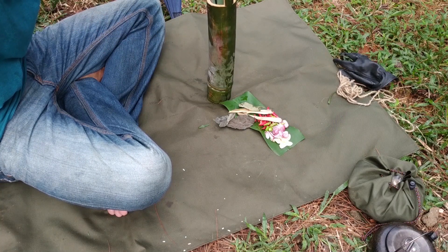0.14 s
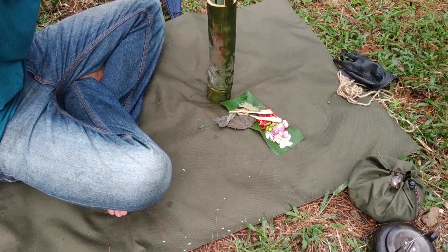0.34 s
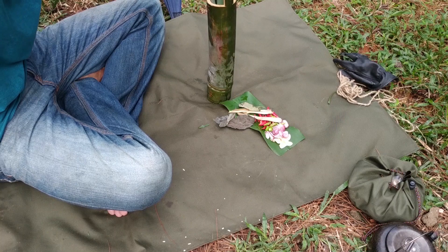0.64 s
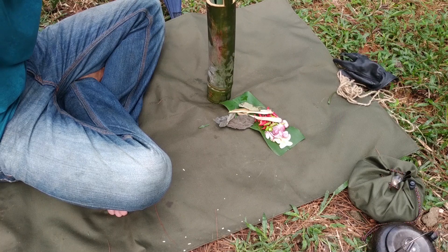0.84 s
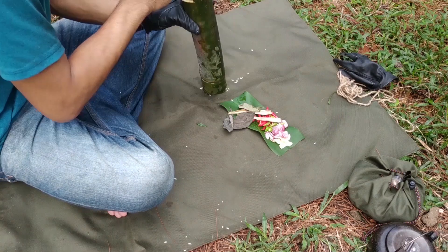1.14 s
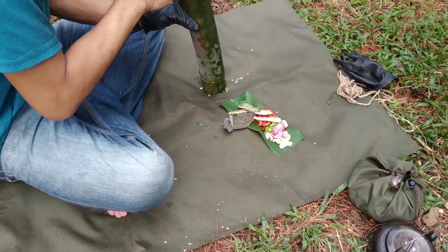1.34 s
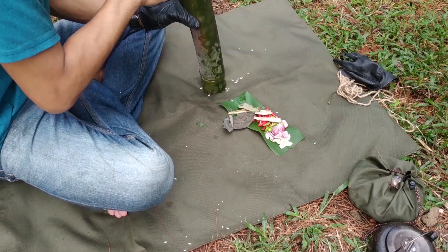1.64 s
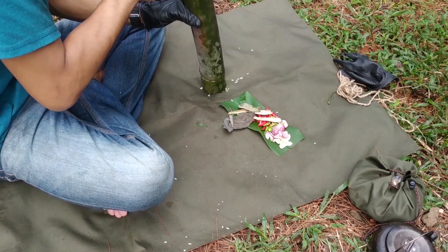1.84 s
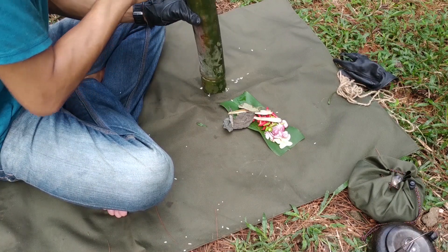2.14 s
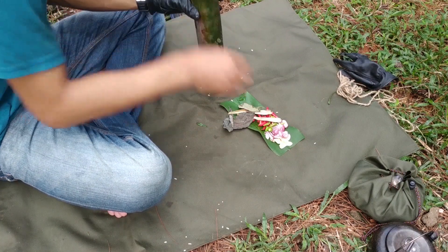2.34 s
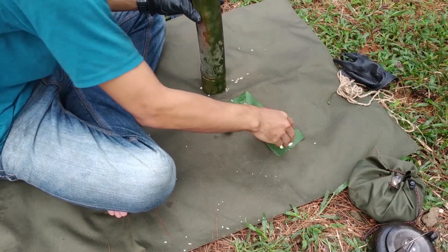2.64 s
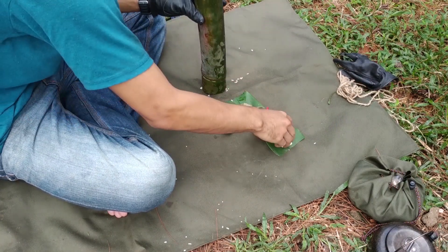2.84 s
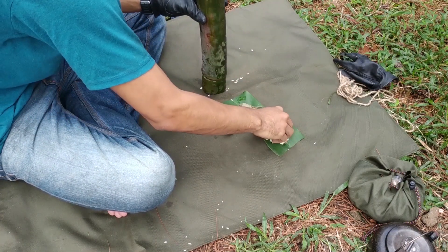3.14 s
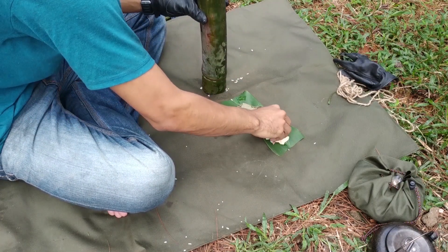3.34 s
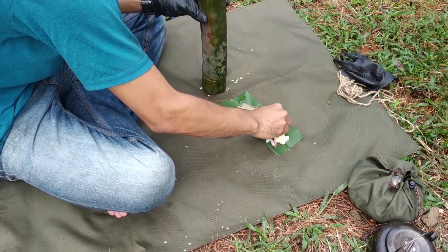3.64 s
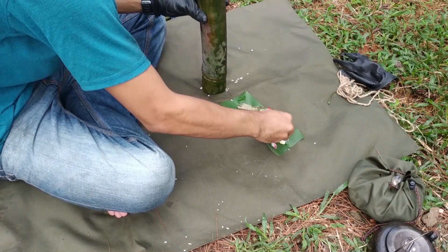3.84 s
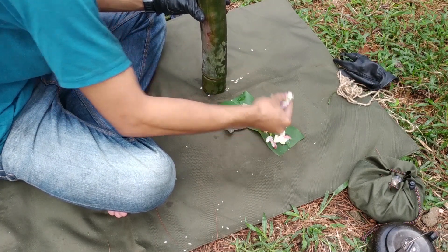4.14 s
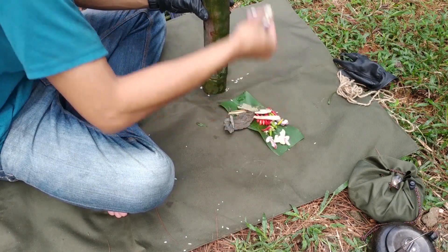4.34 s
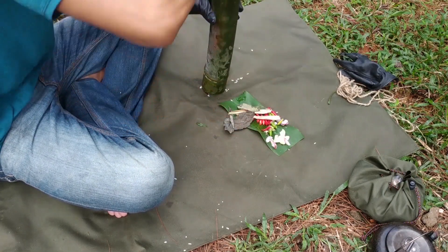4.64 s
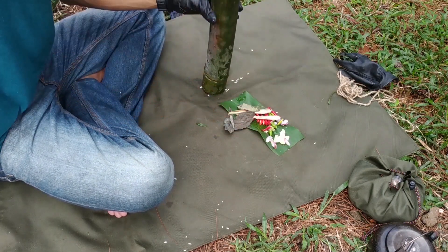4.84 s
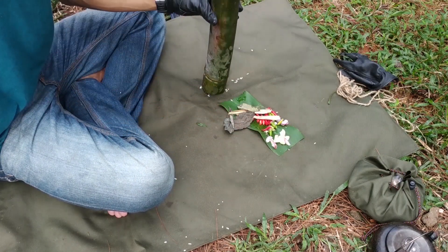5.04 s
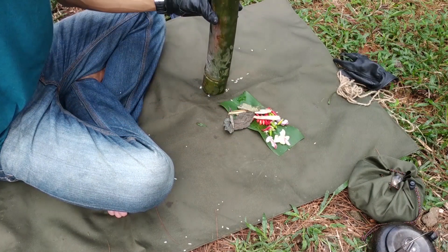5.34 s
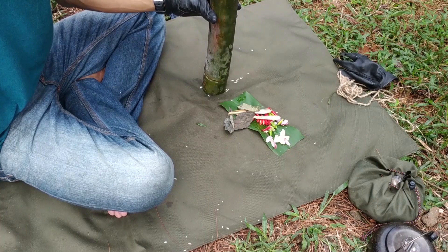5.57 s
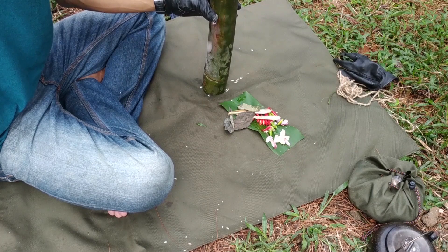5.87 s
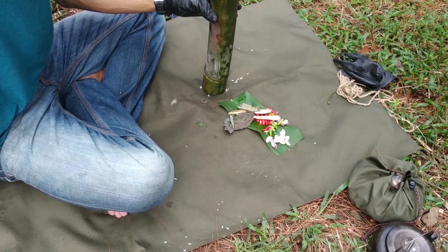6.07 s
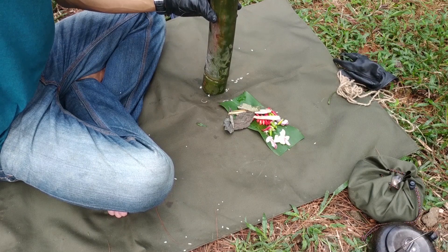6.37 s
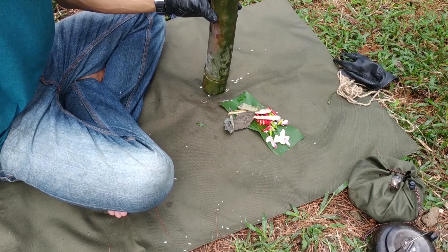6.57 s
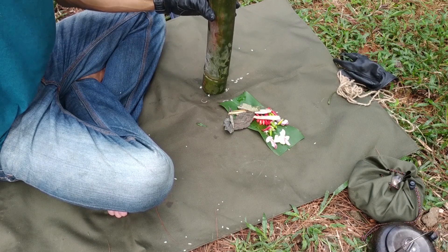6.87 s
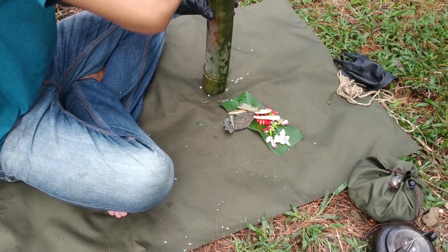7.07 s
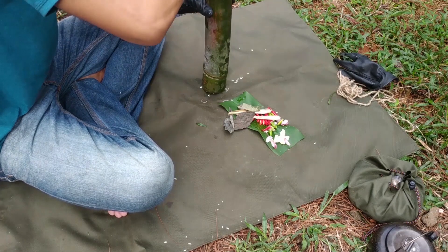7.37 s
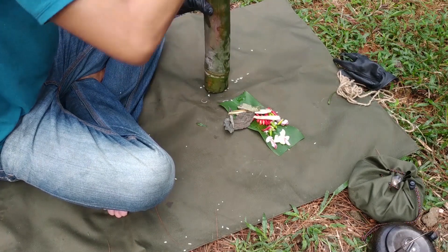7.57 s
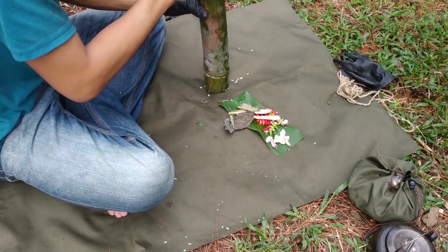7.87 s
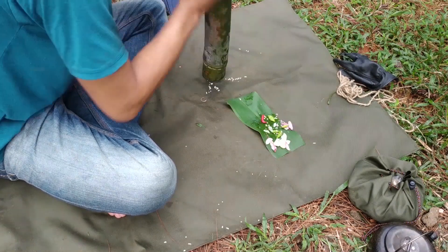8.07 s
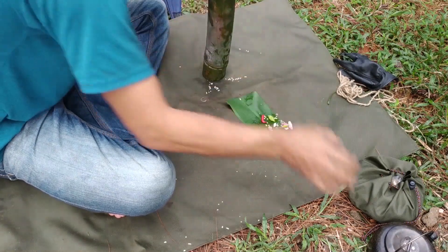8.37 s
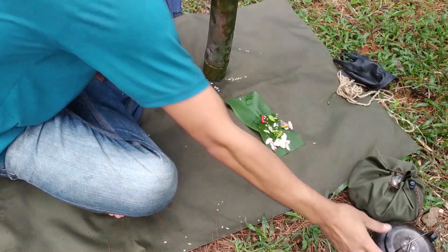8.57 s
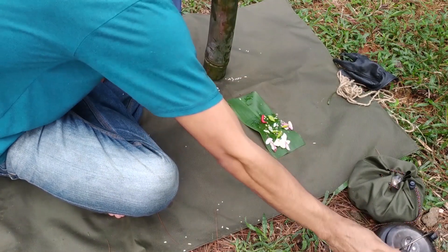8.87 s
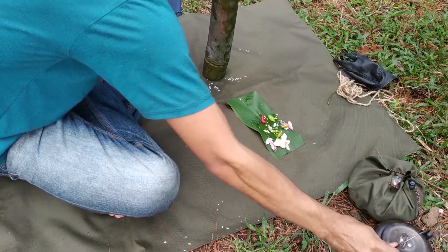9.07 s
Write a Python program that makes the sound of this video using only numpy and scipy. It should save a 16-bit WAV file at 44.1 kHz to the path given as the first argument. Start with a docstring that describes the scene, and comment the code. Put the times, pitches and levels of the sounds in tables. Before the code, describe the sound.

Near microphones at a wood's edge, grains rush briefly through plastic into a hollow tube, with sharp crinkly ticks. Several quick bag shakes and dull cloth bumps follow, then a calm stretch of insect buzz, high wavering whine, airy hiss and faint far calls. Small pieces knock drily in the tube while fingers rub and crackle softly. A distant drone swells slightly after six seconds; finally a metal lid clanks on a pot, short and dry.

```python
"""Rice into bamboo at the wood's edge

Close to the stereo microphones, dry rice runs from a plastic bag into a bamboo tube: showers of tiny grains.
The bag is shaken empty and its film snaps, as filtered noise; spices follow, with soft crackle and dead knocks.
A hand knocks a lidded pot, built from decaying modes and a noise clash, and dull bumps come off the cloth.
Behind are a thin gliding whine, a pulsed cicada buzz, faint far calls in narrow bands, hiss and low rumble."""
import sys
import numpy as np
from scipy import signal
from scipy.fft import rfft, irfft, next_fast_len
from scipy.io import wavfile

SR = 44100
rng = np.random.default_rng(int(sys.argv[2]) if len(sys.argv) > 2 else 0)


def dump_mix(stems):
    """Bounce the given channels to the path in sys.argv[1] as a 16-bit WAV at rate SR."""
    frames = np.atleast_2d(stems).T  # one column per channel
    limited = np.clip(frames, -1, 1)  # hard clip at full scale
    pcm = np.round(limited * 32767).astype(np.int16)
    wavfile.write(sys.argv[1], SR, pcm)


N = 406161

# Every table named ..._COLOUR is a spectrum. Each row: frequency in Hz, relative power density in dB.
# Low rumble in the distance.
RUMBLE_COLOUR = [(25, -26), (60, -33.5), (90, -18.5), (125, -13.5), (170, -2.5), (215, 0.5), (280, -6.5),
                 (400, -29.5), (800, -28.5)]
RUMBLE_DB, RUMBLE_WAVER_DB = -54.5, -1
# A deeper drone, perhaps far traffic, that swells and fades once; it is half as strong one width from its peak.
SWELL_COLOUR = [(50, -38), (90, -10.5), (130, 3.5), (190, 13.5), (270, 1), (400, -7), (800, -42.5)]
SWELL_AT_S, SWELL_WIDTH_S, SWELL_DB = 6.39, 0.78, -49
# Even hiss of the wood.
AIR_COLOUR = [(150, -9), (350, 1.5), (700, -2.5), (1500, -6.5), (2600, -3.5), (3500, 1.5), (4200, -9.5),
              (5100, -2), (7000, -2.5), (9700, -5.5), (12000, -7.5), (13400, 10.5), (15000, -48)]
AIR_DB = -47.5
# Stereo likeness of noise. Each row: frequency in Hz, correlation of left and right from -1 to 1.
LIKENESS = [(60, 1), (250, 0.76), (600, 0.54), (1400, 0.5), (3000, -0.13), (7000, -0.074), (15000, 0.25)]
# Calls far off in the trees. Each row: start in seconds, end in seconds, settled pitch in Hz,
# opening height above it in Hz, bandwidth in Hz, trill rate in Hz, level before the trill in dB.
CALLS = [(2.8, 3.845, 5060, 2, 400, 28.5, -58.5), (3.245, 3.613, 2570, -4, 260, 5.5, -59.5),
         (5.24, 5.605, 2350, 905, 150, 2, -54.5), (8.165, 8.696, 2820, -1, 300, 4, -59),
         (8.999, 9.3, 2360, 597.5, 260, 2, -51)]
# Band of the cicada.
CICADA_COLOUR = [(6500, -52), (7300, -6.5), (7750, 2), (8400, 6), (8800, 1.5), (9300, -43), (10500, -90)]
CICADA_DB = -44.5
# Tones of the whine. Each row: multiple of the fundamental, multiple of the flutter rate, relative level in dB.
WHINE_TONES = [(4, 0, 6), (4, -1, -3.5), (4, 1, -10.5), (4, -2, -34), (4, 2, -27), (4, -3, -33),
               (3, 0, -17.5), (2, 0, -10), (1, 1, -19.5)]
# Fundamental of the whine, left ear then right.
# Each row: base level in dB at the lowest pitch, base level in dB at the highest.
ROOT_EARS = [(-47.5, -55), (-53, -44.5)]
ROOT_FROM_S, ROOT_EARLY_DB = 1.65, -8   # the fundamental is weaker until then
FLUTTER_HZ, WHINE_EAR_LAG_S = 322, .00009
# pitches of the partial two octaves above the fundamental
WHINE_LOW_HZ, WHINE_SWING_HZ, WHINE_CREEP_HZ_PER_S = 13470, 148, 3
WHINE_CYCLE_S, WHINE_RISE_S, WHINE_LOWEST_AT_S = 1.995, .8, 1.28
# Soft bumps on the ground cloth. Each row: start in seconds, peak level before filtering in dB.
BUMPS = [(1.28, -61), (1.48, -55), (8.16, -56)]
# Dull colour of the bumps.
BUMP_COLOUR = [(25, -8), (70, -7), (140, 5), (400, -33), (1000, -74)]
BUMP_S = 0.1   # time to die away by 60 dB
# Knocks on the pot. Each row: start in seconds, relative body level in dB, metallic clash level in dB,
# clash decay by 60 dB in seconds, pitch factor of the low modes.
KNOCKS = [(8.72, -27.5, -27, 0.14, 0.97), (8.7438, -30, -14, 0.072, 1.04), (8.7475, -24.5, -15, 0.071, 1.0),
          (8.78, -29.5, -35.5, 0.27, 1.06), (8.815, -39.5, -40.5, 0.11, .9), (8.893, -33, -34, 0.33, .93),
          (8.974, -33.5, -18, 0.017, 0.78)]
# Modes of the pot and its lid. Each row: frequency in Hz, relative level in dB, decay by 60 dB in seconds.
POT = [(320, -17, 0.12), (454.6, -10.5, 0.28), (537, 4, 0.066), (581, -7, 0.11), (693, -9, 0.1),
       (880, -16, 0.15), (1142, -14, 0.14), (1210, -15, 0.09), (1770, -4, 0.046), (1906, -3, 0.064),
       (2450, -4.5, 0.15), (4140, -18, 0.1), (4710, 2, 0.058), (6000, -29, .07), (6900, -10, 0.12),
       (7400, -21, .04)]
# Metallic clash of lid on pot.
CLASH_COLOUR = [(530, -24), (900, -2), (1620, -10), (1990, 5.5), (2760, -38), (3150, 2.5), (4460, -1.5),
                (5480, 4), (6250, 2), (7680, 7), (16000, -6)]
# Thud of the ground beneath the pot.
THUD_COLOUR = [(25, -4), (70, -5), (300, -11), (1000, -16)]
# Stray grains and pieces landing in the tube. Each row: start in seconds, relative peak in dB, pitch in Hz.
TAPS = [(0.51, -33, 880), (0.675, -35, 1900), (0.767, -36, 1400), (0.829, -31.5, 1170), (1.799, -32, 2100),
        (1.943, -37, 2570), (2.211, -35, 1600), (2.221, -36, 710), (4.013, -42, 1030), (4.779, -47.5, 1020),
        (4.945, -38, 1490), (5.004, -42, 1810), (5.709, -33, 2270), (5.848, -41, 2200), (5.9583, -29, 1210),
        (5.968, -28.5, 1370), (5.9911, -28.5, 756), (6.165, -27.5, 1075), (6.167, -51, 1150),
        (6.227, -33.5, 3240), (6.347, -39.5, 2120), (6.445, -35.5, 2840), (6.485, -35.5, 765),
        (6.847, -36, 2340), (6.925, -45.5, 2500), (7.029, -45.5, 1200), (7.122, -38, 2120),
        (7.204, -41, 2120), (7.256, -41.5, 595), (7.346, -36, 2200), (7.465, -40, 2100),
        (7.944, -41.5, 1910), (8.053, -30, 3200), (8.135, -43, 716)]
# Grains stirred under a landing piece.
STIR_COLOUR = [(300, 8.0), (1100, 6), (2500, 6.5), (4500, 1), (14000, -7)]
# Fingers rub spices into the mouth of the tube.
# Each row: start in seconds, length in seconds, relative rustle level in dB.
RUBS = [(4.39, 0.061, -67.5), (4.79, 0.16, -68.5), (4.98, 0.074, -64), (5.48, 0.027, -65.5),
        (5.76, 0.012, -63.5), (6.06, 0.041, -65), (6.18, 0.054, -60.5), (6.48, 0.14, -65.5),
        (6.7, 0.079, -62), (7.275, 0.11, -58.5), (7.42, .05, -63), (7.56, 0.077, -64.5),
        (7.935, 0.024, -61), (8.03, 0.15, -63.5)]
# Crackle of fingers and spices.
FINGER_COLOUR = [(200, 2), (600, 10.5), (1500, 7), (2600, 10.5), (4000, 8), (6000, 11), (11000, 2.5),
                 (16000, -119)]
RUB_ATTACK_S, RUB_RELEASE_S = 0.038, 0.051   # time to rise and to fall by 20 dB
GRIP_S, GRIP_DB = (5.6, 7.6), -73   # the glove creaks faintly on the tube; level relative to the rubs
# Snaps of thin plastic, and two hard ticks of rice grains at 0.119 s and 0.463 s. # Each row: start in seconds,
# relative peak in dB, relative body against the tick in dB.
SNAPS = [(0.119, -16, -25), (0.1766, -2, -32), (0.2965, -7, -26), (0.4227, -3.5, -28), (0.4304, -14, -26),
         (0.463, -10, -22), (0.5184, -11, -13), (0.8885, -5.5, -48), (1.104, -24, -3), (5.0474, -16, -30),
         (6.7204, -18, -14), (7.357, -14.5, -0.5), (7.567, -22, -10), (8.0502, -14, -24)]
# Bright tick of a snap, then its body.
TICK_COLOUR = [(3000, -15.0), (7000, 4.0), (10000, 18.0), (16000, -1.5)]
SNAP_BODY_COLOUR = [(500, -46), (2000, 10.5), (9000, 1)]
# Shakes of the bag. Each row: start in seconds, length in seconds, relative rustle level in dB.
SHAKES = [(1.065, 0.043, -62), (1.145, 0.061, -51.5), (1.27, .045, -56.5), (1.385, 0.043, -52),
          (1.485, 0.049, -51), (1.595, 0.022, -50.5), (1.93, 0.012, -64), (2.13, 0.12, -58.5)]
# Rustle of the film.
BAG_COLOUR = [(120, -27), (200, -10), (311, -16), (709, -17), (1370, -4), (3020, 3), (3900, -6),
              (5230, 1.5), (12600, 3.5), (13300, 7), (16000, -16)]
SHAKE_ATTACK_S, SHAKE_RELEASE_S = 0.034, 0.036   # time to rise and to fall by 20 dB
BAG_HELD_S, BAG_HELD_DB = (0, 2.1), -71   # the film stirs faintly while held; level relative to the shakes
# Grains shaken down into the tube.
FALLING_COLOUR = [(300, -8.5), (520, 3.5), (750, 0), (1200, -4.5), (3000, -6.5), (8000, -59)]
# Spurts of last grains against the bag.
# Each row: start in seconds, relative peak in dB, decay by 60 dB in seconds.
SPURTS = [(1.1373, -12, 0.037), (1.162, -27, 0.022), (1.267, -18, 0.062), (1.48, -15, 0.018),
          (1.4827, -0.5, 0.011), (1.4942, 0.5, 0.016), (1.509, -21, 0.022), (1.514, -5.5, 0.016),
          (1.509, -11, 0.037), (1.525, -15, 0.039), (1.529, -13.5, 0.018), (1.535, -8, 0.018),
          (1.535, -12, 0.018), (1.613, -21, 0.059)]
# Bright colour of the spurts.
SPURT_COLOUR = [(220, -8), (450, -11.5), (1000, -0.5), (1900, 4), (3000, 2.5), (5500, -1.5), (9500, 7),
                (13000, 0), (16000, -2.5)]
# Stream of rice. Each row: time in seconds, relative patter in the tube in dB, relative hiss of sliding in dB.
POUR = [(0.0, -37.5, -39.5), (0.24, -31.5, -34), (0.428, -35.5, -34.5), (0.494, -43, -39),
        (0.512, -34, -40), (0.57, -45.5, -46.5), (0.692, -42.5, -43), (0.934, -53, -55), (1.04, -78, -65)]
# Patter of grains on the heap.
PATTER_COLOUR = [(88, -24), (150, -24), (210, -9), (258, -3.5), (299, -2.5), (562, -0.5), (835, 2),
                 (1010, 1.5), (1870, 2), (3670, 1), (5000, -6), (6500, -17), (11000, -120)]
# Hiss of grains sliding over plastic.
SLIDE_COLOUR = [(2000, 0), (3500, -5.5), (5500, 3.5), (6500, -0.5), (9000, 1.5), (12500, -1), (15500, -2),
                (17000, -71)]
CUTOFF_HZ = 16100


def from_db(db):
    """Amplitude of a level in dB."""
    return 10 ** (np.asarray(db) / 20)


def rms_one(x):
    """Scale to an RMS of one."""
    return x / np.sqrt(np.mean(x ** 2) + 1e-20)


def seconds():
    """Time of every sample."""
    return np.arange(N) / SR


def in_time(rows):
    """The columns of a curve, sample by sample."""
    s, *columns = np.transpose(rows)
    return [np.interp(seconds(), s, c) for c in columns]


def during(start, end, fade=0.015):
    """One between two times, with soft edges outside them."""
    inside = np.minimum(seconds() - start, end - seconds())
    return np.clip(inside / fade + 1, 0, 1)


def at_hz(points, size):
    """A spectrum table on the bins of a transform, interpolated over log frequency."""
    hz, values = np.transpose(points)
    bins_hz = np.arange(size // 2 + 1) * SR / size
    return np.interp(np.log(bins_hz + 1), np.log(hz), values)


def drift(rate):
    """Slow random wander of spread 1, smoothed by two poles at a rate in Hz."""
    step = 40   # samples between drawn points
    r = np.exp(-2 * step * np.pi * rate / SR)
    raw = rng.standard_normal(N // step + 2002)
    slow = signal.lfilter([1], [1, -2 * r, r * r], raw)[2000:]
    return np.interp(np.arange(N) / step, np.arange(len(slow)), rms_one(slow))


def coloured(x, spectrum):
    """Minimum-phase filter with the given spectrum and a steep low end; white noise keeps its power."""
    size = 4096
    hz = np.arange(size // 2 + 1) * SR / size
    low_end = np.clip(hz / spectrum[0][0], .03, 1) ** 2
    gain = rms_one(from_db(at_hz(spectrum, size)) * low_end)
    # folding the cepstrum forward makes the response causal
    cepstrum = irfft(np.log(gain))[:size // 2]
    cepstrum[1:] *= 2
    response = irfft(np.exp(rfft(cepstrum, size)))
    return signal.fftconvolve(np.atleast_2d(x), response[None], axes=-1)[:, :N]


def spread(pair):
    """Two unrelated signals become left and right, alike in the bass and mostly apart in the treble."""
    size = next_fast_len(N + N % 2) // 2 * 2
    alike = np.clip(at_hz(LIKENESS, size), -.99, .99)
    mid, side = irfft(rfft(pair, size) * np.sqrt([1 + alike, 1 - alike]), size)[:, :N]
    return np.array([mid + side, mid - side]) / np.sqrt(2)


def noise():
    """White noise across the stereo width."""
    return spread(rng.standard_normal((2, N)))


def grains(per_s, size_db):
    """Tiny collisions at random moments, their strength in dB spread by a capped exponential draw."""
    born = rng.random(N) < per_s / SR
    sizes = from_db(size_db * np.minimum(rng.exponential(1, N), 4))
    return rms_one(spread(born * sizes * rng.standard_normal((2, N))))


def bursts(times, levels_db, lengths):
    """Sudden rushes of noise that die by 60 dB in their length."""
    envelope = np.zeros(N)
    for s, db, t60 in zip(times, levels_db, lengths):
        start = round(s * SR)
        age = seconds()[:min(SR // 4, N - start)]
        envelope[start:][:len(age)] += from_db(db - 60 * age / max(t60, .001))
    return envelope * noise()


def strokes(rows, attack_s, release_s):
    """Gain of a series of hand movements: each rises, holds for its length and falls."""
    t, gain = seconds(), np.zeros(N)
    for start, length, db in rows:
        before = np.maximum(start - t, 0) / attack_s
        after = np.maximum(t - start - length, 0) / release_s
        gain = np.maximum(gain, from_db(db - 20 * np.minimum(before + after, 10)))
    return gain


def outdoors():
    """Low far rumble, with one slow swell, under the even hiss of the wood: three filtered noises."""
    rumble = from_db(RUMBLE_DB + RUMBLE_WAVER_DB * drift(4.5)) * coloured(noise(), RUMBLE_COLOUR)
    nearness = 1 / (1 + ((seconds() - SWELL_AT_S) / SWELL_WIDTH_S) ** 2)
    swell = from_db(SWELL_DB) * nearness * coloured(noise(), SWELL_COLOUR)
    air = from_db(AIR_DB) * coloured(noise(), AIR_COLOUR)
    return rumble + swell + air


def far_calls():
    """Each trilled call glides to its note; echoes among the trees are rendered as a narrow noise band."""
    out, source = np.zeros((2, N)), noise()
    glide_s = .022
    for start, end, hz, fall_hz, width_hz, trill_hz, db in CALLS:
        age = np.maximum(seconds() - start, 0)
        pitch_hz = hz + fall_hz * np.exp(-age / glide_s)
        note = np.cos(2 * np.pi * np.cumsum(pitch_hz) / SR)
        smear = signal.sosfilt(signal.butter(2, width_hz / 2, fs=SR, output="sos"), source)
        trill = np.cos(np.pi * trill_hz * age) ** 2
        out += from_db(db) * rms_one(note * smear) * trill * during(start, end, fade=0.009)
    return out


def cicada(pulse_hz=118, pulse_depth=0.25):
    """Tymbal pulses, slightly unsteady in rate, shape noise in a broad resonance at a steady level."""
    phase = 2 * np.pi * np.cumsum(pulse_hz + 4 * drift(6.7)) / SR
    pulses = rms_one(np.exp(pulse_depth * np.cos(phase)))
    return from_db(CICADA_DB) * coloured(pulses * noise(), CICADA_COLOUR)


def whine(top_db=-44.5, echo_db=-8, dip_db=6, dip_height=0.4, dip_width=0.22):
    """A shrill glide, perhaps an insect, with flutter tones, a mid-glide dip and two echoes at each ear."""
    t = seconds()
    cycle_s = (t - WHINE_LOWEST_AT_S) % WHINE_CYCLE_S
    height = np.interp(cycle_s, [0, WHINE_RISE_S, WHINE_CYCLE_S], [0, 1, 0])
    top_hz = WHINE_LOW_HZ + WHINE_SWING_HZ * height + WHINE_CREEP_HZ_PER_S * t
    # phase of the fundamental, two octaves below
    phase = 2 * np.pi * np.cumsum(top_hz + 2 * drift(20)) / SR / 4
    flutter = 2 * np.pi * FLUTTER_HZ * t
    shrill = np.zeros(N)
    for multiple, offset, db in WHINE_TONES:
        shrill += from_db(top_db + db) * np.cos(multiple * phase + offset * flutter + drift(.5))
    shrill *= from_db(-dip_db * np.exp(-((height - dip_height) / dip_width) ** 2))
    early_db = ROOT_EARLY_DB * during(0, ROOT_FROM_S, fade=0.079)
    out = np.zeros((2, N))
    # the fundamental leans left when low and right when high
    for ear, (low_db, high_db) in enumerate(ROOT_EARS):
        lags_s = rng.uniform([.015, .035], [.03, .055])
        echoes = sum(np.roll(shrill, round(lag * SR)) for lag in lags_s)
        root_db = low_db + (high_db - low_db) * height + early_db + 2.2 * drift(4)
        root = from_db(root_db) * np.cos(phase + .5 * drift(1.5))
        direct = np.roll(shrill + root, ear * round(WHINE_EAR_LAG_S * SR))
        out[ear] = direct + from_db(echo_db) * echoes
    return out


def bumps():
    """Dull thuds as the tube and the body shift on the ground: dying low noise."""
    s, peak_db = np.transpose(BUMPS)
    return coloured(bursts(s, peak_db, [BUMP_S] * len(s)), BUMP_COLOUR)


def pot(lag_s=0.0002, hard_above_hz=3000, low_cut_hz=250, thud_db=-27):
    """The lid clashes on the pot, reaching the left first; metal contact drives the high modes."""
    age = np.maximum(seconds()[:SR // 5] - [[0], [lag_s]], 0)
    body = np.zeros((2, N))
    for s, body_db, clash_db, length, seating in KNOCKS:
        for hz, level_db, t60 in POT:
            # the way the lid sits shifts the low modes from knock to knock
            blow_db, pitch = (clash_db - 6.5, hz) if hz > hard_above_hz else (body_db, hz * seating)
            mode = from_db(-60 * age / t60) * np.sin(2 * np.pi * pitch * age)
            chance_db = rng.normal(0, 1.2)
            body[:, round(s * SR):][:, :age.shape[1]] += from_db(blow_db + level_db + chance_db) * mode
    # a small vessel radiates little bass; only the ground under it thuds
    body = signal.sosfilt(signal.butter(2, low_cut_hz, "high", fs=SR, output="sos"), body)
    s, body_db, clash_db, length, seating = np.transpose(KNOCKS)
    thud = coloured(bursts(s, clash_db + thud_db, length), THUD_COLOUR)
    clash = coloured(bursts(s, clash_db, length), CLASH_COLOUR)
    return body + thud + clash


def taps(cycles=15.5, overtone=1.6, overtone_db=-9):
    """Each piece lands with a dead two-tone knock of a few cycles and stirs the grains beneath it."""
    knocks = np.zeros(N)
    for s, peak_db, hz in TAPS:
        turns = hz * seconds()[:SR // 20]
        upper = from_db(overtone_db) * np.sin(2 * np.pi * overtone * turns)
        knock = np.sin(2 * np.pi * turns) - upper
        # it dies by 60 dB in the given number of cycles
        knocks[round(s * SR):][:len(turns)] += from_db(peak_db + 6.0 - 60 * turns / cycles) * knock
    s, peak_db, hz = np.transpose(TAPS)
    settling_s = [.028] * len(s)
    stir = coloured(bursts(s, peak_db - 0.5, settling_s), STIR_COLOUR)
    return signal.sosfilt(signal.butter(2, 350, "high", fs=SR, output="sos"), knocks) + stir


def fingers():
    """Soft crackle of gloved fingers and spices at the rim: tiny collisions swelling with each rub."""
    effort = strokes(RUBS, RUB_ATTACK_S, RUB_RELEASE_S) + from_db(GRIP_DB) * during(*GRIP_S)
    crackle = grains(4000, size_db=2.0) * from_db(2.8 * drift(45))
    return from_db(16.5) * coloured(crackle * effort, FINGER_COLOUR)


def snaps():
    """A crease flips over, or a hard grain strikes: a bright tick with a little body."""
    s, peak_db, body_db = np.transpose(SNAPS)
    t60 = [.013] * len(s)
    tick = coloured(bursts(s, peak_db - 11, t60), TICK_COLOUR)
    body = coloured(bursts(s, peak_db + body_db - 12, t60), SNAP_BODY_COLOUR)
    return tick + body


def bag(falling_db=9):
    """The film crackles in clumps as it is shaken; grains drop into the tube and spurt brightly against it."""
    effort = strokes(SHAKES, SHAKE_ATTACK_S, SHAKE_RELEASE_S) + from_db(BAG_HELD_DB) * during(*BAG_HELD_S)
    rustle = effort * from_db(18 + 2.5 * drift(49)) * grains(9000, size_db=1.0)
    falling = effort * from_db(falling_db) * grains(1500, size_db=3.5)
    s, peak_db, length = np.transpose(SPURTS)
    spurts = coloured(bursts(s, peak_db - 9.0, length), SPURT_COLOUR)
    return coloured(rustle, BAG_COLOUR) + coloured(falling, FALLING_COLOUR) + spurts


def rice(full_per_s=9000, clump_db=1.0, thin_clump_db=3.0, bounces_per_s=130, bounce_db=-39):
    """Grains slide over plastic and patter on the heap; a thinner stream has fewer of them, in clumps."""
    patter_db, slide_db = in_time(POUR)
    flow = from_db(patter_db - patter_db.max())
    per_s = full_per_s * flow ** .8
    # offsets the loss of power as the grains grow fewer
    even = np.sqrt(per_s.mean() / per_s)
    clumps = (clump_db * flow + thin_clump_db * (1 - flow)) * drift(26)
    patter = coloured(grains(per_s, size_db=0.5), PATTER_COLOUR)
    patter = from_db(patter_db + 1.0 + clumps) * patter
    slide = coloured(grains(2 * per_s, size_db=-2.0), SLIDE_COLOUR)
    slide = from_db(slide_db + 8.5 + 0.76 * clumps) * slide
    # single grains bounce off the wall and stand out as the stream thins
    bounces = coloured(grains(bounces_per_s, size_db=0.5), PATTER_COLOUR)
    bounces = from_db(bounce_db) * np.sqrt(flow) * bounces
    return ((patter + slide) * even + bounces) * during(0, POUR[-1][0])


def scene():
    """Near handling sounds in front of the wood."""
    wood = outdoors() + far_calls() + cicada() + whine()
    handling = bumps() + pot() + taps() + fingers() + snaps() + bag() + rice()
    return wood + handling


def record(dry):
    """A steep elliptic low-pass cuts the top of what the microphones hear."""
    return signal.sosfilt(signal.ellip(10, .2, 80, CUTOFF_HZ, fs=SR, output="sos"), dry)


dry = scene()
out = record(dry)
dump_mix(out)
```